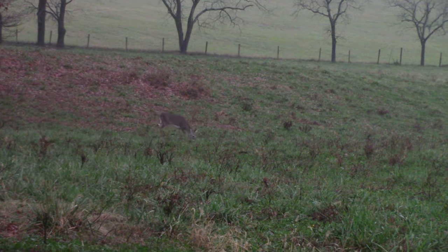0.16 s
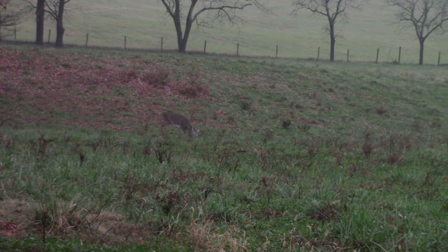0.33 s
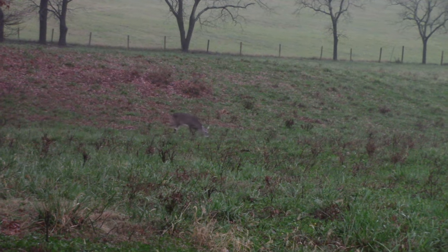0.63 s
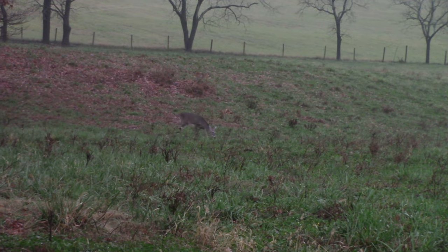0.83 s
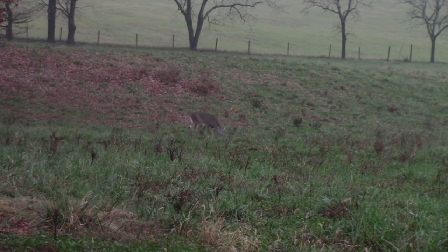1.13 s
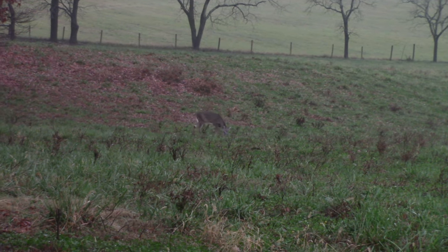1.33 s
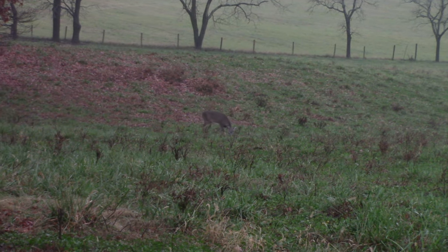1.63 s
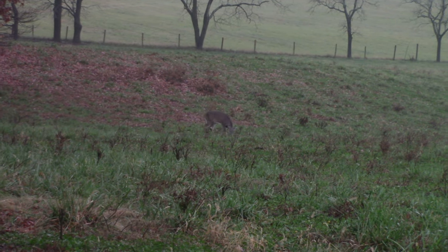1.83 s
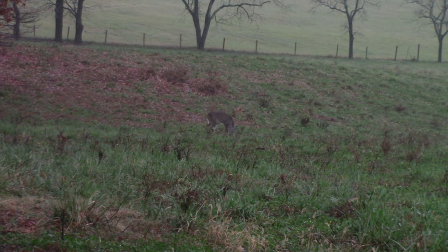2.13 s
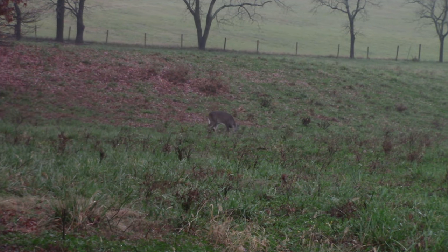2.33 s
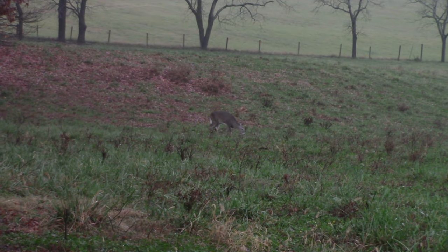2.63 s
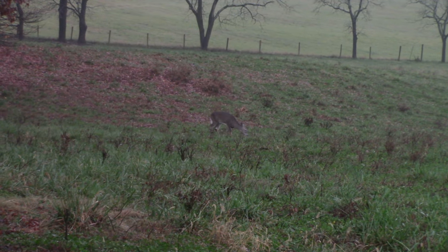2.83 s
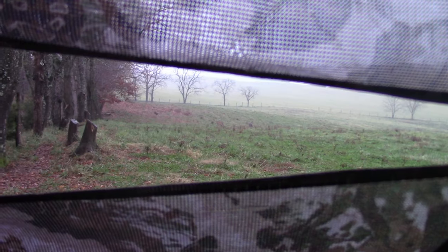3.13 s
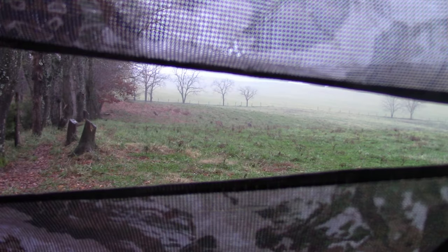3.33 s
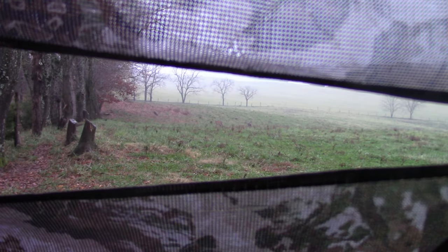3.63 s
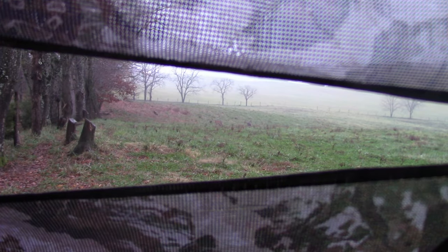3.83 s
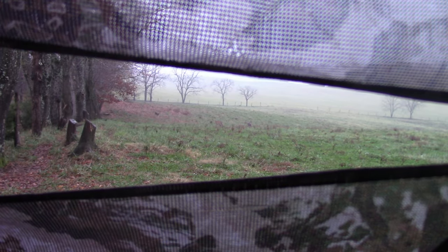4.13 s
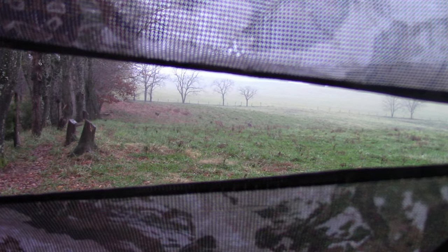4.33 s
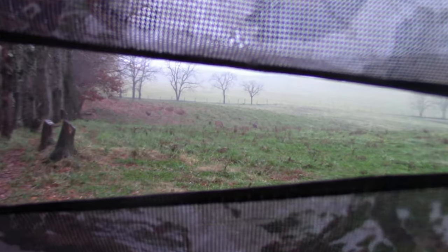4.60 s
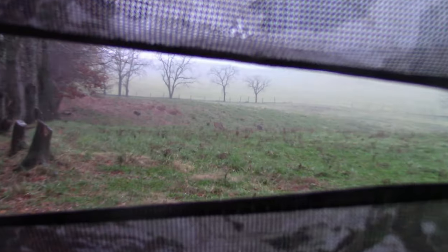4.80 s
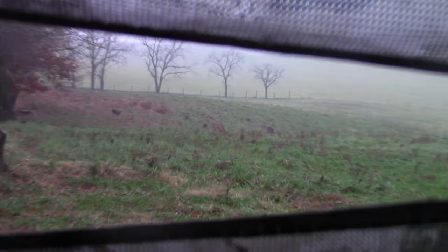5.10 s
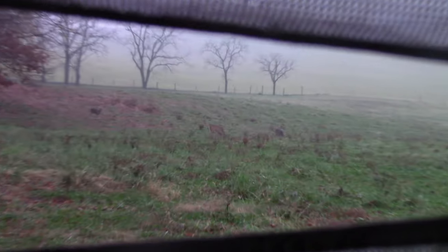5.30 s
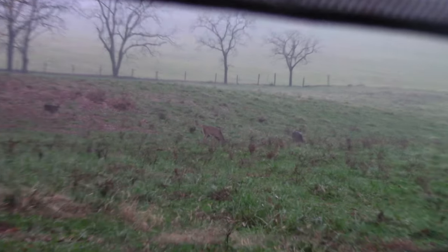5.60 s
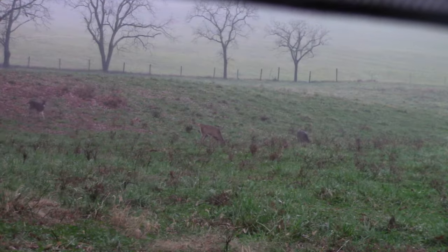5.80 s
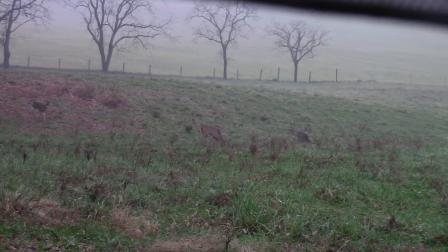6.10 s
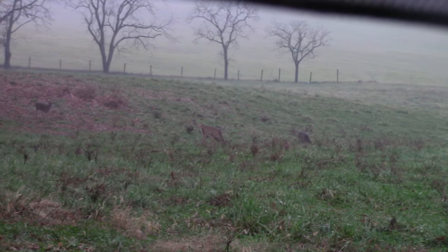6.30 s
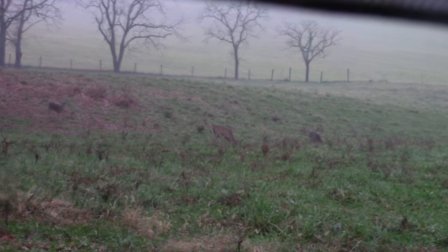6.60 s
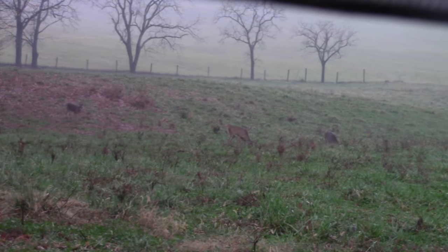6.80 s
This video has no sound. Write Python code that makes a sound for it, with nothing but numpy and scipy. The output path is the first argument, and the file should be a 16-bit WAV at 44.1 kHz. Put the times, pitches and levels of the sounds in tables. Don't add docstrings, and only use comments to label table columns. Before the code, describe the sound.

A light shower is heard as a low, muffled wash with sparse faint drops and far chirps, broken by a single startling thump. After a tiny silence, heavier rain starts at once: steady patter on stretched cloth, scattered sharp taps, a crisp high tick, and a cluster of hard knocks near six seconds. Close microphone, short enclosed echoes.

```python
import sys
import numpy as np
from scipy import signal
from scipy.io import wavfile
from scipy.ndimage import uniform_filter1d

SR = 44100
rng = np.random.default_rng(int(sys.argv[2]) if len(sys.argv) > 2 else 0)


def convert_level_to_amplitude(level_db):
    exponent = np.asarray(level_db, float) / 20
    return 10 ** exponent


def generate_wav(sig):
    pcm = np.round(np.clip(np.atleast_2d(sig).T, -1, 1) * 32767).astype(np.int16)
    wavfile.write(sys.argv[1], SR, pcm)


N = 306495

WALL_S = 0.0043


def falls():
    # start in seconds, peak in dB,
    # cloth pitch in Hz, splash in dB, echo in dB.
    knocks = [(1.8824, -1.5, 524, -26.5, -12), (1.992, -27, 620, -12, -7), (3.242, -16, 500, -14, 1),
              (4.04, -13, 830, -18, -7), (4.95, -18.5, 606, -18, -6.5), (5.6755, -8, 534, -17, -3),
              (5.6785, -11.5, 824, -13.5, -1), (5.6835, -9, 980, -14.5, -10), (5.799, -11.5, 490, -21, 2.5),
              (5.8068, -16.5, 1010, -11, -8), (5.917, -8, 596, -12, -6), (5.9242, -15, 1180, -10, -8)]
    # start in seconds, peak in dB, cloth pitch in Hz, splash in dB.
    small_drops = [(0.052, -43, 746, -18), (0.099, -41, 982, -6), (0.183, -45, 1100, -5),
                   (0.359, -43, 1590, -24), (0.45, -43, 651, -10), (0.639, -51.5, 694, 2),
                   (0.715, -46, 750, -23), (0.754, -45, 864, -21), (0.847, -43.5, 770, -2),
                   (1.109, -48.5, 1220, -1.5), (1.455, -45, 684, -22), (1.619, -46, 821, -4),
                   (1.748, -52.5, 926, 0), (2.284, -48, 926, -14), (2.605, -41, 999, -18),
                   (2.819, -47, 667, -20), (2.879, -44.5, 794, -6)]
    # start in seconds, peak in dB, cloth pitch in Hz, splash in dB.
    big_drops = [(3.016, -34, 982, -16), (3.061, -27, 923, -15), (3.185, -22.5, 1550, -14),
                 (3.2215, -22.5, 950, -10), (3.32, -26, 1020, -25), (3.426, -19.5, 937, -14),
                 (3.535, -25.5, 633, -19), (3.956, -20, 705, -24), (3.98, -29, 1070, -3.5),
                 (4.053, -23.5, 800, -15), (4.189, -25, 638, -11), (4.2153, -20, 706, -20),
                 (4.376, -24, 1100, -19), (4.368, -30.5, 1800, 1.5), (4.418, -22, 600, -22),
                 (4.4463, -18.5, 750, -24), (4.494, -22, 546, -10), (4.702, -23.5, 686, -12),
                 (4.859, -27, 929, -9), (4.904, -26, 646, -20), (5.065, -25.5, 980, -6.5),
                 (5.151, -24.5, 657, -9.5), (5.599, -22, 724, -23), (5.705, -28, 756, -6),
                 (5.736, -32, 958, 1), (5.7625, -21, 950, -20), (5.8915, -22.5, 800, -16),
                 (5.996, -23, 991, -9), (6.387, -22.5, 754, -28), (6.505, -24, 546, -11)]
    slack_t60_s, slack_hz, shortening = 0.07, 600, 0.47
    small_echo_db, big_echo_db, drop_t60_s = -12, -15, 0.06
    rows = [(*row, slack_t60_s * (slack_hz / row[2]) ** shortening) for row in knocks]
    rows += [(*row, small_echo_db, drop_t60_s) for row in small_drops]
    rows += [(*row, big_echo_db, drop_t60_s) for row in big_drops]
    return rows


def drops(rows):
    # frequency in Hz, level in dB.
    splash = [(500, -12.5), (1200, 10), (2500, 10), (4000, 4), (7000, -2), (11000, -13.5), (16000, -58)]
    # frequency in Hz, gain in dB.
    response = [(30, -32), (130, 1.5), (250, 0.5), (500, 1.5), (1000, 3.5), (2500, 3), (9000, 2)]
    out = np.zeros(N)
    t = np.arange(6600) / SR
    sprays = evened(coloured(rng.standard_normal((len(rows), len(t))), splash))
    burst = 1.37 * np.exp(-t / 0.00081) + np.clip(t / WALL_S, 0.25, 1)
    for row, spray, signs in zip(rows, sprays, scatter(sprays.shape)):
        s, peak_db, hz, splash_db, echo_db, t60 = row
        turns = 0.69 * hz * t + 0.55 * (1 - np.exp(-hz * t / 0.26))
        swing = -np.sin(2 * np.pi * turns) * np.exp(-((turns - 0.75) / 0.81) ** 2)
        thrown = swing[:600] + 0.73 * band(swing[:600], 5.0 * hz, 1.55)
        late = convert_level_to_amplitude(echo_db) * signal.oaconvolve(thrown, echoes(len(t), t60, signs))[:len(t)]
        wet = convert_level_to_amplitude(splash_db - 2.5 - 60 * t / (1.35 * t60)) * burst * spray
        add(out, s + 0.0016, convert_level_to_amplitude(peak_db - 2.5) * (swing + late + wet))
    return coloured(out, response)


def shower(level, colour, texture):
    per_s, spread_db, far_db, patchy_db = texture
    s, level_db = np.transpose(level)
    t = np.arange(s[0], s[-1] + 0.018, 1 / SR)
    far = convert_level_to_amplitude(far_db)
    near = np.sqrt(1 - far ** 2)
    white = far * hiss(len(t), patchy_db) + near * patter(len(t), per_s, spread_db)
    return s[0], convert_level_to_amplitude(np.interp(t, s, level_db)) * evened(coloured(white, colour))


def patter(n, per_s, spread_db, count=30):
    size = convert_level_to_amplitude(spread_db * np.minimum(rng.exponential(1, n), 3.5))
    size = size * (rng.random(n) < per_s / SR)
    kind = rng.integers(0, count, n)
    t = np.arange(2400) / SR
    out = np.zeros(n)
    for k, hz in enumerate(np.geomspace(350, 10000, count)):
        slap = rng.standard_normal(len(t)) * np.exp(-t / 0.0014)
        slap = slap / np.linalg.norm(slap)
        click = slap + convert_level_to_amplitude(-0.5) * echoes(len(t), 0.088, scatter(len(t)))
        grain = band(band(click, hz, 2.75), hz, 2.75)
        weight = hz ** 0.38 / np.linalg.norm(grain)
        out += signal.oaconvolve(size * (kind == k), weight * grain)[:n]
    return evened(out)


def ticks():
    # start in seconds, peak in dB, pitch in Hz.
    droplets = [(0.3386, -51, 6110), (0.4873, -52, 7180), (0.6389, -46, 7860), (1.037, -46, 8690),
                (1.1752, -45, 6240), (1.6167, -50, 8220), (1.7848, -48, 7820), (1.9444, -50, 6030),
                (2.2563, -48, 6260), (2.606, -45, 10100), (2.8719, -48, 6360), (2.9567, -47, 8660),
                (3.5872, -22, 7200), (3.5908, -40, 13500), (3.647, -28.5, 8900), (3.8894, -39, 6040),
                (4.1694, -41, 6130), (4.371, -33, 5440), (4.6694, -31, 6180), (5.06, -29, 6100),
                (5.7524, -36, 6340), (6.2138, -34, 6230), (6.8743, -35, 6070)]
    # frequency in Hz, level in dB.
    housing = [(3500, -32), (5500, -20), (8000, 11), (12000, -6), (16000, -16)]
    t60_s = 0.0078
    out = np.zeros(N)
    t = np.arange(1300) / SR
    clicks = evened(coloured(rng.standard_normal((len(droplets), len(t))), housing))
    for (s, peak_db, hz), click in zip(droplets, clicks):
        ring = np.sin(2 * np.pi * hz * t) + 0.66 * click
        onset = 1 - np.exp(-t / 0.0002)
        add(out, s + 0.0005, convert_level_to_amplitude(peak_db - 4 - 60 * t / t60_s) * onset * ring)
    return out


def birds():
    # start in seconds, length in seconds, start pitch in Hz, end pitch in Hz, level in dB.
    calls = [
        (.236, .048, 4800, 4620, -75),
        (1.236, 0.0334, 3250, 2660, -63),
        (1.621, 0.036, 3080, 2970, -66),
        (2.071, 0.0047, 2300, 2700, -50),
        (2.078, .009, 2830, 3130, -63),
        (2.603, 0.013, 2360, 2250, -60),
        (2.645, 0.044, 4950, 5000, -74),
    ]
    out = np.zeros(N)
    for s, length, start_hz, end_hz, level_db in calls:
        hz = np.linspace(start_hz, end_hz, round(length * SR))
        flutter = 1 + 0.88 * evened(uniform_filter1d(rng.standard_normal(len(hz)), size=90))
        whistle = np.sin(2 * np.pi * np.cumsum(hz) / SR) * signal.windows.tukey(len(hz), 0.6)
        add(out, s, convert_level_to_amplitude(level_db + 7.0) * flutter * whistle)
    return out + convert_level_to_amplitude(-7.0) * signal.oaconvolve(out, echoes(3000, 0.1, scatter(3000)))[:N]


def hiss(n, patchy_db):
    a, b, patches = rng.standard_normal((n // 128 + 8, 257, 3)).T
    patches = uniform_filter1d(uniform_filter1d(patches, 8, 0), 16, 1)
    spectra = (a + 1j * b) * convert_level_to_amplitude(patchy_db * evened(patches))
    return evened(signal.istft(spectra, nperseg=512, noverlap=384)[1][:n])


def echoes(n, t60, signs):
    t = np.arange(n) / SR
    taps = signs * convert_level_to_amplitude(-60 * t / t60) * np.clip(t / WALL_S, 0, 1) ** 1.76
    return taps / np.linalg.norm(taps)


def scatter(shape):
    return rng.standard_normal(shape) * (rng.random(shape) < 3000 / SR)


def band(x, hz, octaves):
    b, a = signal.iirpeak(min(hz, 0.45 * SR), 1.4 / octaves, SR)
    return signal.lfilter(b, a, x)


def coloured(x, points):
    hz = abs(np.fft.fftfreq(8192, 1 / SR))
    log_gain = np.log(convert_level_to_amplitude(np.maximum(read(points, hz), -100)))
    taps = np.fft.ifft(np.exp(np.conj(signal.hilbert(log_gain)))).real[:4096]
    taps = np.reshape(taps, (1,) * (x.ndim - 1) + (-1,))
    return signal.oaconvolve(x, taps, axes=-1)[..., :x.shape[-1]]


def read(points, hz):
    f, value = np.transpose(points)
    return np.interp(np.log(hz + 1), np.log(f + 1), value)


def evened(x):
    return x / np.sqrt(np.mean(x ** 2) + 1e-20)


def add(mix, s, sound):
    part = mix[round(s * SR):][:len(sound)]
    part += sound[:len(part)]


def scene():
    # time in seconds, level in dB.
    light_level = [(0.0, -51.5), (0.41, -53), (2.9, -52), (2.97, -51)]
    heavy_level = [(2.98, -33.5), (3.05, -37), (3.2, -35.5), (4.42, -36), (4.86, -36.5), (5.9, -35.5),
                   (6.2, -36), (6.95, -35.5)]
    # frequency in Hz, density in dB per Hz.
    light_colour = [(20, -28), (47, -20), (90, 0), (220, -5.5), (360, -2), (620, -7), (950, -7.5),
                    (1300, -13), (1650, -12), (2000, -16), (6200, -25.5), (9000, -31), (12000, -39.5),
                    (15600, -47)]
    heavy_colour = [(12, -87), (20, -46), (37, -35), (72, -14), (106, -5.5), (149, -8.5), (232, -8),
                    (334, -1), (885, -2.5), (1310, -3.5), (5560, -15.5), (8690, -21.5), (11200, -31.5),
                    (15600, -49)]
    # drops per second, size spread in dB, share of far hiss in dB, patchiness in dB.
    light_texture = (200, 3, -0.6, 1.0)
    heavy_texture = (405.5, 2.5, -2, 1.0)
    # start in seconds, end in seconds.
    gap = (2.9695, 2.9792)
    light, heavy = np.zeros(N), np.zeros(N)
    t = np.arange(N) / SR
    add(light, *shower(light_level, light_colour, light_texture))
    add(heavy, *shower(heavy_level, heavy_colour, heavy_texture))
    near = drops(falls()) + ticks() + birds()
    before = np.clip((gap[0] - t) / 0.0003, 0, 1)
    after = np.clip((t - gap[1]) / 0.0015, 0, 1)
    return (before * (light + near) + after * (heavy + near))[None]


def top_cut(x):
    return signal.sosfilt(signal.butter(12, 15750, fs=SR, output="sos"), x)


def record(dry):
    edge = signal.firwin(511, 15600, window=("kaiser", 9), fs=SR)
    mix = signal.oaconvolve(dry, edge[None], "same")
    return top_cut(mix)


dry = scene()
out = record(dry)
generate_wav(out)
```